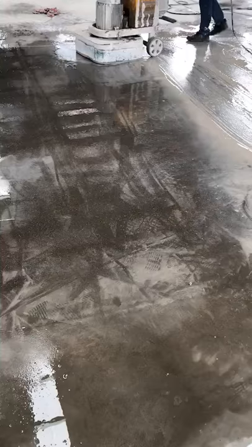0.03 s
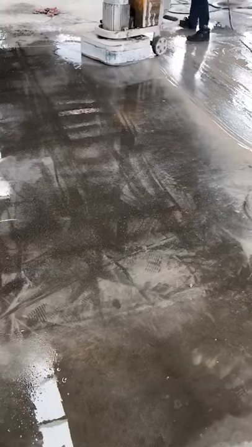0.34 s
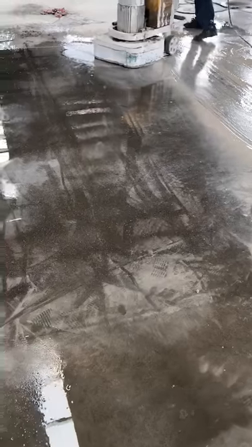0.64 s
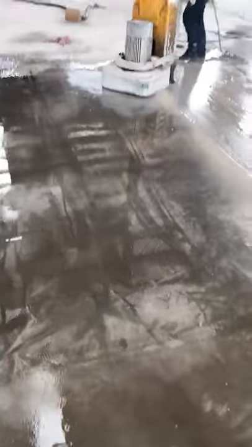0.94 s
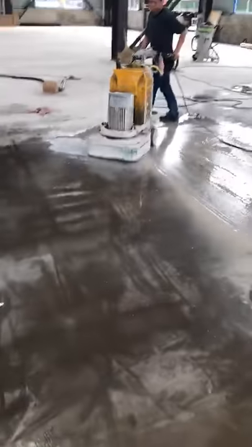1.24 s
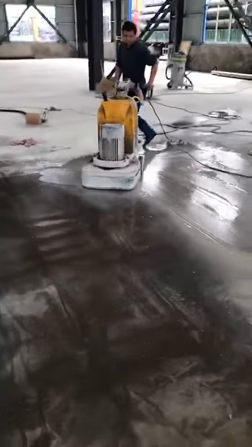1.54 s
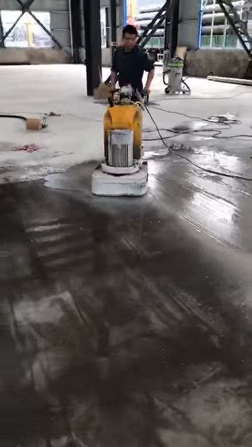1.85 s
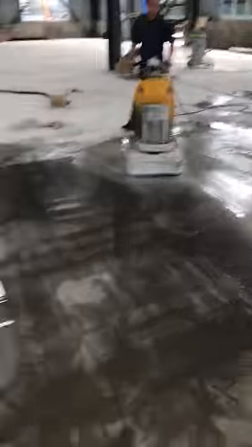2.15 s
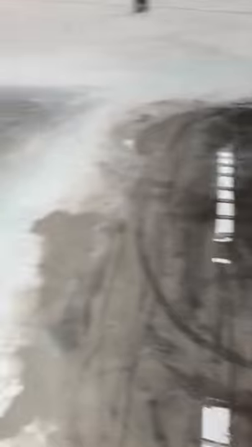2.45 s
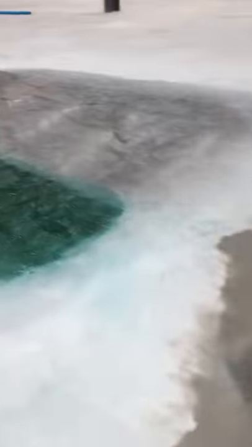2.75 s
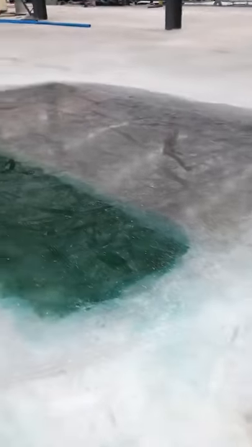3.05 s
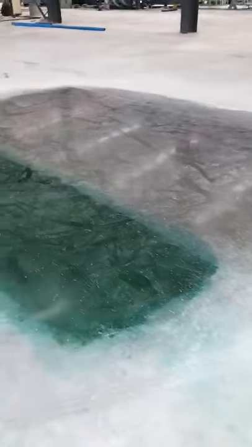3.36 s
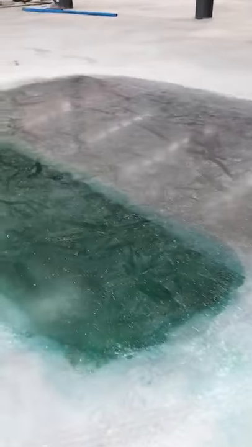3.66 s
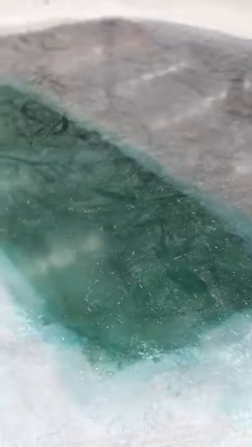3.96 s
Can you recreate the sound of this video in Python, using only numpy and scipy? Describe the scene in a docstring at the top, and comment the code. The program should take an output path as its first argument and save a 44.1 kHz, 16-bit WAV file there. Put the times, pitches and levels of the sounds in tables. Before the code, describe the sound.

A floor grinder scrapes and hisses over wet concrete, its motor droning in a large hall.

```python
"""A walk-behind grinder polishes a wet concrete floor in a large hall, heard from one moving microphone.
The discs scrape and hiss, the housing drums, gear tones ride on the shaft speed and the motor drive
whines thinly. The floor mirrors the hiss, which sweeps in colour as the microphone moves and turns away.
The machine clacks once; near the end, moving air and a bump rumble right on the microphone."""
import sys
import numpy as np
from scipy import signal
from scipy.fft import rfft, irfft, next_fast_len
from scipy.io import wavfile
from scipy.ndimage import uniform_filter1d, map_coordinates

SR = 44100
rng = np.random.default_rng(int(sys.argv[2]) if len(sys.argv) > 2 else 0)


def int16_out(signal):
    """Quantize to a 16-bit WAV file."""
    q = np.round(np.clip(np.atleast_2d(signal).T, -1, 1) * 32767)
    wavfile.write(sys.argv[1], SR, q.astype(np.int16))


N = 176400
SHAFT_HZ = 17.95


def amp(db):
    """Decibels to gain."""
    return 10 ** (np.asarray(db) / 20)


def unit(x):
    """x scaled to rms 1."""
    return x / np.sqrt(np.mean(x ** 2) + 1e-20)


def clock():
    """The time of each sample in seconds."""
    return np.arange(N) / SR


def along(points, hz):
    """Rows of (f/Hz, value), interpolated at hz on a log axis."""
    freqs, values = np.transpose(points)
    return np.interp(np.log(hz + 1), np.log(freqs + 1), values)


def curves(rows):
    """One value per sample for each column after the time."""
    times, *columns = np.transpose(rows)
    return [np.interp(clock(), times, column) for column in columns]


def wobble(knots_per_s):
    """A smooth random curve."""
    return map_coordinates(rng.standard_normal(1024), [clock() * knots_per_s], mode="mirror")


def bell(peak_s, half_s):
    """A bell-shaped envelope."""
    return np.exp(-.5 * ((clock() - peak_s) / half_s) ** 2)


def filtered(x, response):
    """x through a filter whose gain is response(hz)."""
    size = next_fast_len(N + SR // 4)
    return irfft(rfft(x, size) * response(np.fft.rfftfreq(size, 1 / SR)), size)[:N]


def coloured(x, spectrum):
    """x shaped by rows of (f/Hz, relative level/dB), at rms 1."""
    return unit(filtered(x, lambda hz: amp(along(spectrum, hz))))


def resonances(modes):
    """Noise rung through modes of (f/Hz, width/Hz, relative level/dB), at rms 1."""
    def body(hz):
        return sum((-1) ** k * amp(db) * 1j * hz * width / (centre ** 2 - hz ** 2 + 1j * hz * width)
                   for k, (centre, width, db) in enumerate(modes))
    return unit(filtered(rng.standard_normal(N), body))


def swell(waves, peak_s, half_s, db):
    """Low pressure waves, evened out over 50 ms and shaped into a short swell."""
    even = waves / np.sqrt(np.abs(uniform_filter1d(waves ** 2, size=2205)) + 1e-6)
    return amp(db) * bell(peak_s, half_s) * even


def off_floor(x):
    """x plus its reflection from the wet floor, whose extra distance changes as the microphone moves."""
    # delay behind the direct sound: t/s, lag/ms
    floor_lag = [(.2, 1.45), (.7, 1.45), (.95, 1.6), (1.2, 1.65), (1.65, 1.59), (1.9, 1.53), (2.17, 1.48),
                 (2.45, 1.25), (2.7, 1.0), (2.9, .77), (3.15, .63), (3.6, .52), (4, .38)]
    # strength of the reflection: f/Hz, gain
    floor_gain = [(100, 0.26), (500, 0.21), (1100, 0.34), (1800, 0.29), (3000, 0.41), (4500, 0.16),
                  (7500, .1)]
    lag_ms, = curves(floor_lag)
    echo = filtered(x, lambda hz: along(floor_gain, hz))
    return x + map_coordinates(echo, [np.arange(N) - lag_ms * SR / 1000])


def microphone_rumble(rise=2.4, fall=2.57):
    """Puffs of air and a soft bump, right on the moving microphone."""
    # air puffs: peak t/s, half length/s, level/dB, centre f/Hz
    puffs = [(2.77, 0.055, -38.5, 44.3), (2.985, 0.043, -32.5, 46), (3.105, 0.057, -30, 44.4),
             (3.59, 0.03, -27, 49), (3.903, 0.046, -21, 60), (3.983, 0.015, -24, 69)]
    # bump: peak t/s, half length/s, level/dB
    bumps = [(3.763, 0.016, -19.5)]
    # its dull thud: f/Hz, relative level/dB
    thud = [(25, -25), (50, -4), (80, 3), (170, -4.5), (260, -12.5), (420, -22.5), (1000, -46)]
    out = np.zeros(N)
    for peak_s, half_s, db, centre in puffs:
        # rise and fall are powers of frequency below and above the centre
        hump = lambda hz: (hz / centre) ** rise / (1 + (hz / centre) ** (rise + fall))
        out += swell(unit(filtered(rng.standard_normal(N), hump)), peak_s, half_s, db)
    for peak_s, half_s, db in bumps:
        out += swell(coloured(rng.standard_normal(N), thud), peak_s, half_s, db)
    return out


def housing(shake_db=1.0, drum_trim_db=-0.5, rumble_trim_db=-1):
    """The shaken housing drums over a deep rumble in the hall."""
    # drumming and rumble before their trims: t/s, drum level/dB, rumble level/dB
    levels = [(.2, -39.5, -40), (.55, -41.5, -37), (1.13, -41.5, -39), (1.22, -40.5, -46),
              (1.65, -40, -40.5), (1.85, -39, -49), (2.4, -36.5, -36.5), (2.8, -39, -38.5),
              (3.45, -41.5, -41.5), (4, -42.5, -35.5)]
    # colours of housing and hall: f/Hz, relative level/dB
    drum_spectrum = [(50, -28), (90, -6.5), (120, -5), (165, 1), (220, -2.5), (260, -1.5), (310, -0.5),
                     (370, -4.5), (450, -19), (900, -35)]
    rumble_spectrum = [(18, -35.5), (33, -12), (44, -3.5), (56, -1.5), (78, -9.5), (110, -18.5), (220, -38)]
    drum_db, rumble_db = curves(levels)
    drum_db += shake_db * wobble(40)
    drum = unit(off_floor(coloured(rng.standard_normal(N), drum_spectrum)))
    rumble = coloured(rng.standard_normal(N), rumble_spectrum)
    return amp(drum_db + drum_trim_db) * drum + amp(rumble_db + rumble_trim_db) * rumble


def hall_tones(pitches, levels, trim_db=-2.5, fade_db=2.1, flutter_db=2.2, wander_hz=3.5):
    """Tones flutter and fade among the hall's reflections; their balance shifts as the microphone turns."""
    turned = np.clip((clock() - 2.72) / .44 + .5, 0, 1)  # a 0.44 s turn centred on 2.72 s
    out = np.zeros(N)
    for hz, (facing_db, away_db) in zip(pitches, levels):
        phase = 2 * np.pi * (np.cumsum(hz + wander_hz * wobble(40)) / SR + rng.random())
        level_db = facing_db + (away_db - facing_db) * turned
        unsteady_db = fade_db * wobble(6) + flutter_db * wobble(45)
        out += amp(level_db + trim_db + unsteady_db) * np.sin(phase)
    return np.sqrt(2) * out


def motor():
    """Gear tones from low on the machine, mirrored by the floor, and the whine of the drive."""
    # gear tones: multiples of the shaft speed
    gear_orders = [3, 9, 14, 15, 17, 27, 31, 54, 63, 66, 73, 81]
    # drive tones: f/Hz
    whine_hz = [2131, 4001, 4087, 4173, 4678, 6045]
    # one row per tone, before the trim: level/dB facing the machine, level/dB turned away
    gear_levels = [(-47.5, -47), (-51, -45.5), (-51.5, -60), (-46, -56), (-45, -51.5), (-61, -47.5),
                   (-57.5, -53), (-55, -55.5), (-52.5, -55), (-61, -57), (-54.5, -52.5), (-51, -57.5)]
    whine_levels = [(-52.5, -55), (-52.5, -58), (-50.5, -46.5), (-51, -57), (-47, -58), (-59, -66)]
    gears = hall_tones(SHAFT_HZ * np.array(gear_orders), gear_levels)
    return off_floor(gears) + hall_tones(whine_hz, whine_levels)


def clack(rise_s=.006, t60_s=.26):
    """A hard knock on the machine, smeared by the hall."""
    # knock: t/s, level/dB
    knocks = [(1.951, -28.5)]
    # modes of the struck part: f/Hz, width/Hz, relative level/dB
    body_modes = [(1470, 130, -10), (1580, 73, -5), (1930, 250, -11)]
    envelope = np.zeros(N)
    for start_s, db in knocks:
        age = np.maximum(clock() - start_s, 0)
        envelope += amp(db - 60 * age / t60_s) * (1 - np.exp(-age / rise_s))
    return envelope * resonances(body_modes)


def disc_singing(width_share=.032):
    """Now and then a narrow resonance of the discs swells out of the scraping."""
    # swells: peak t/s, half length/s, f/Hz, level/dB
    notes = [(.36, 0.24, 1458, -44.5), (.74, 0.045, 2750, -45.5), (1.2, 0.12, 1145, -46),
             (2.72, .13, 960, -50), (2.96, 0.086, 2670, -42.5), (3.717, .1, 1146, -48.5),
             (3.73, 0.079, 4070, -45.5)]
    return sum(amp(db) * bell(peak_s, half_s) * resonances([(hz, width_share * hz, 0)])
               for peak_s, half_s, hz, db in notes)


def grit(patchy_db, ticks_per_s=2500, spread_db=3.5, tick_gain=.33):
    """Countless grains of concrete break: a dense rush with single ticks on top, in shifting patches."""
    ticks = (rng.random(N) < ticks_per_s / SR) * rng.choice([-1, 1], N)
    strength = amp(spread_db * np.minimum(rng.exponential(size=N), 4))
    rush = rng.standard_normal(N) + tick_gain * unit(ticks * strength)
    spectra = signal.stft(rush, nperseg=512)[2]
    patches = uniform_filter1d(rng.standard_normal(spectra.shape), size=4, axis=0)  # across frequency
    patches = uniform_filter1d(patches, size=12, axis=1)  # across time
    return signal.istft(spectra * amp(patchy_db * unit(patches)), nperseg=512)[1][:N]


def discs(surge_db=.17, chatter_db=.84, shaft_db=.46, ring_db=-14, hiss_lift_db=5):
    """The abrasive scrapes, hisses and rings the head; its bite varies by chance and with each turn."""
    # grinding: t/s, scrape level/dB, hiss level/dB before its lift
    levels = [(0.26, -37, -41.5), (0.34, -37, -42), (1.46, -34.5, -37.5), (2.36, -34.5, -37),
              (2.64, -37, -41), (2.88, -36, -44), (2.92, -36.5, -48.5), (3.11, -36.5, -42.5),
              (3.2, -36, -46), (3.58, -35, -42.5), (3.63, -35.5, -47.5), (3.75, -36.5, -43),
              (4.0, -36, -47.5)]
    # colours of abrasive on wet concrete: f/Hz, relative level/dB
    scrape_spectrum = [(150, -29.5), (400, -4), (700, -5), (1000, -1.5), (1400, -6), (1800, -2),
                       (2500, -0.5), (3300, 1), (4100, 1), (4600, -7), (5400, -34.5), (8000, -45)]
    hiss_spectrum = [(2000, -42.5), (3500, -10), (4700, -0.5), (5700, 1), (6500, -1.5), (7500, -5.5)]
    # modes of the grinding head: f/Hz, width/Hz, relative level/dB
    head_modes = [(920, 100, -0.5), (1142, 63, -4), (1433, 110, 2), (2700, 63, -7), (4160, 120, -5)]
    scrape_db, hiss_db = curves(levels)
    bite_db = surge_db * wobble(18) + chatter_db * wobble(110)
    bite_db += shaft_db * np.sin(2 * np.pi * SHAFT_HZ * clock())
    scrape = coloured(grit(patchy_db=1.2), scrape_spectrum) + amp(ring_db) * resonances(head_modes)
    hiss = coloured(grit(patchy_db=1.95), hiss_spectrum)
    scrape_at_mic = amp(scrape_db) * unit(off_floor(scrape))
    hiss_at_mic = amp(hiss_db + hiss_lift_db) * unit(off_floor(hiss))
    return amp(bite_db) * (scrape_at_mic + hiss_at_mic)


def scene():
    """The grinder in the hall and the rumble on the microphone, the same in both channels."""
    mono = discs() + housing() + motor() + clack() + microphone_rumble() + disc_singing()
    return np.array([mono, mono])


def record(dry):
    """The recorder opens abruptly and cuts off steeply above its band limit."""
    start_s, top_hz = .178, 7590
    band = lambda hz: amp(-np.clip(hz - top_hz, 0, 300) / 3)  # 100 dB down within 300 Hz
    return np.array([filtered(channel * (clock() >= start_s), band) for channel in dry])


dry = scene()
out = record(dry)
int16_out(out)
```